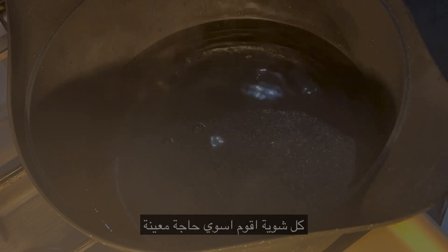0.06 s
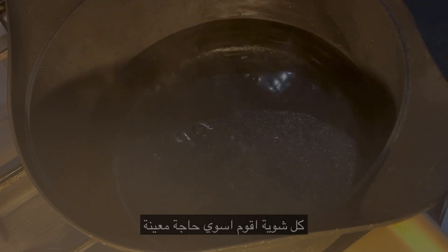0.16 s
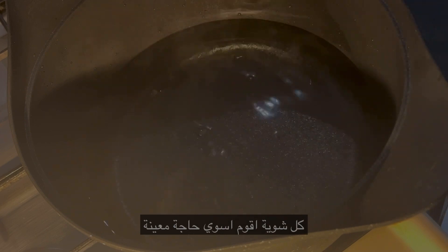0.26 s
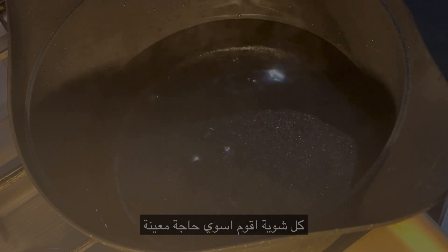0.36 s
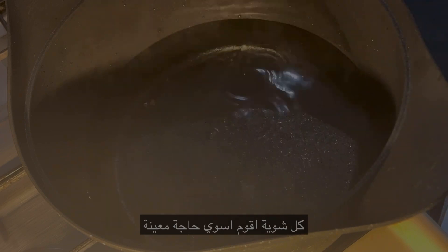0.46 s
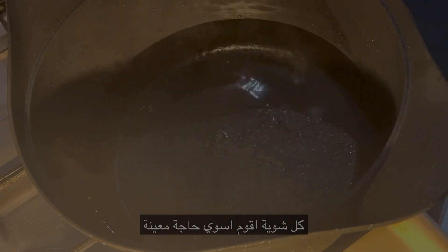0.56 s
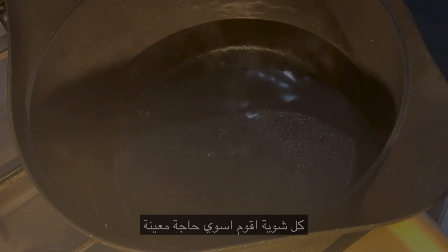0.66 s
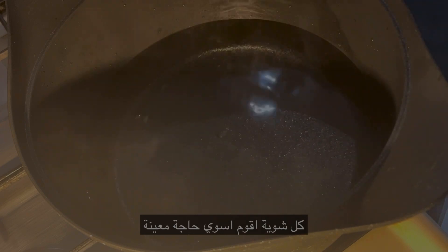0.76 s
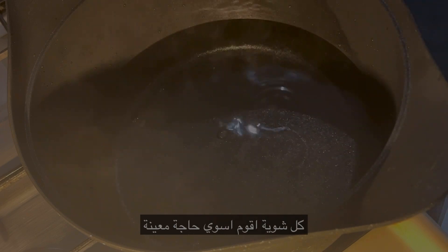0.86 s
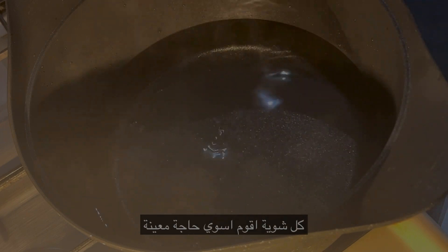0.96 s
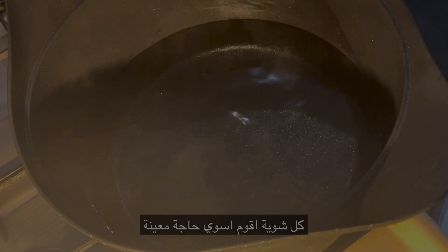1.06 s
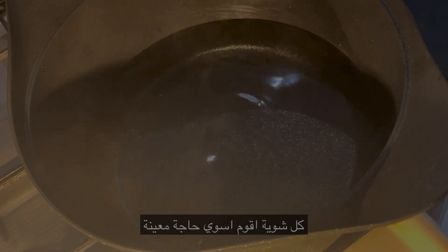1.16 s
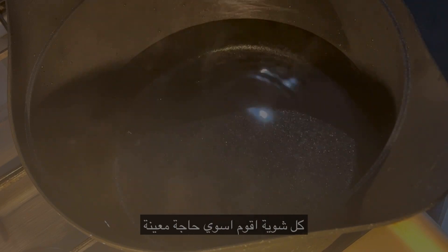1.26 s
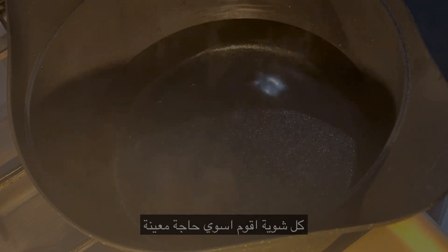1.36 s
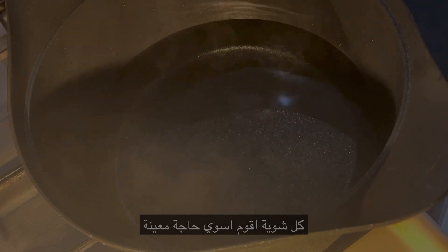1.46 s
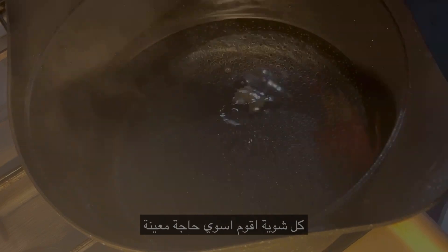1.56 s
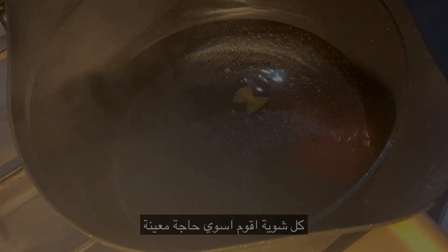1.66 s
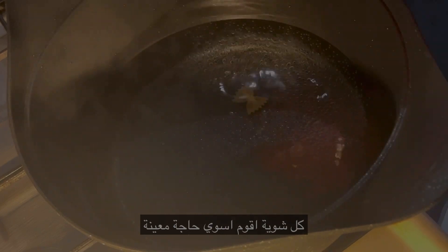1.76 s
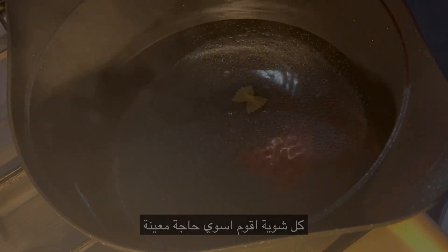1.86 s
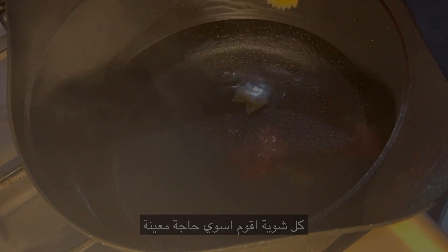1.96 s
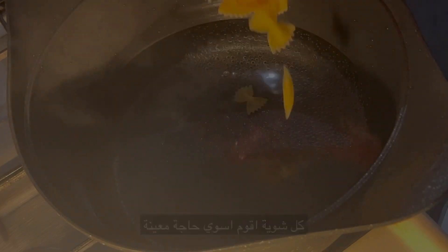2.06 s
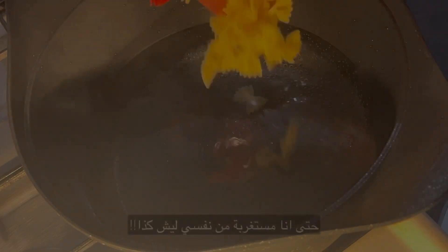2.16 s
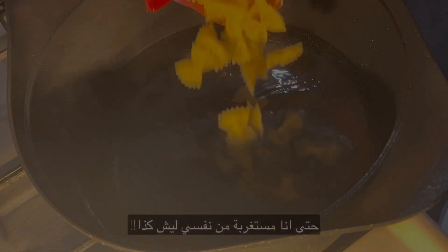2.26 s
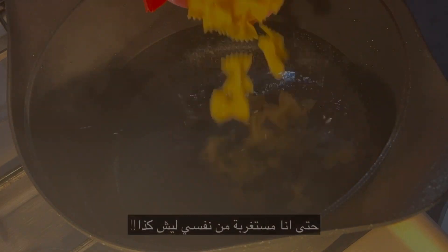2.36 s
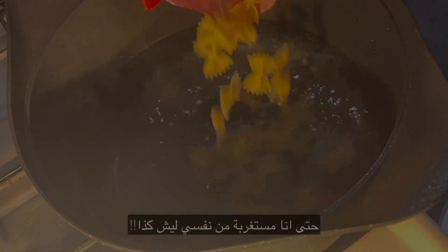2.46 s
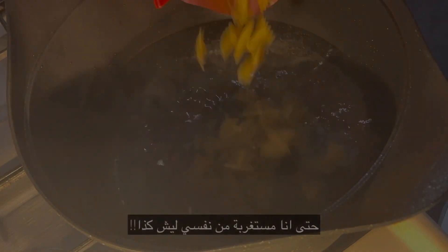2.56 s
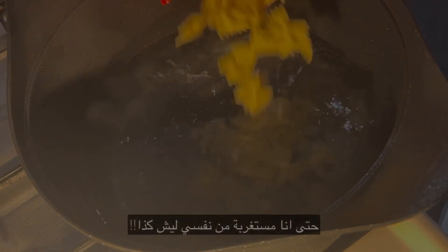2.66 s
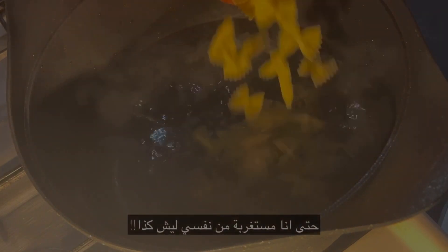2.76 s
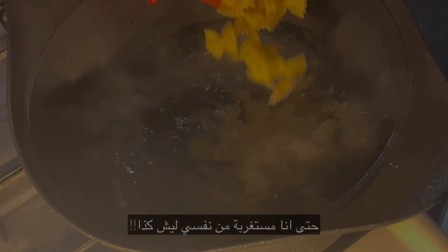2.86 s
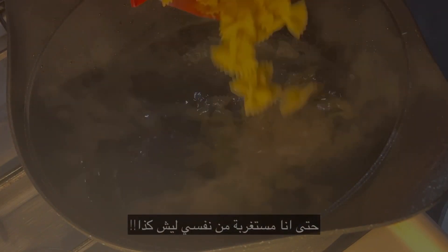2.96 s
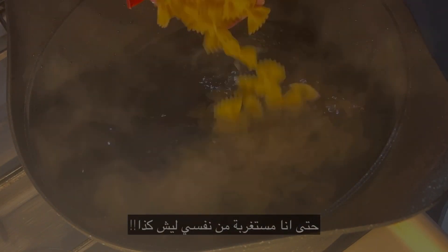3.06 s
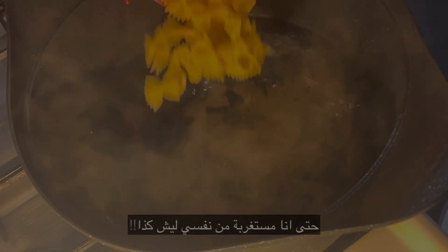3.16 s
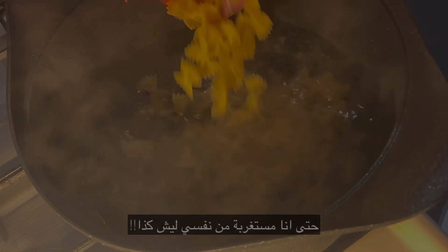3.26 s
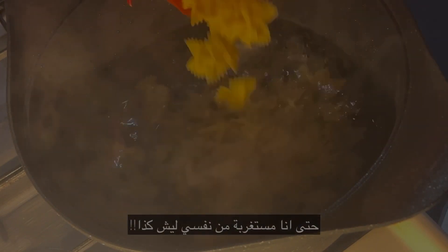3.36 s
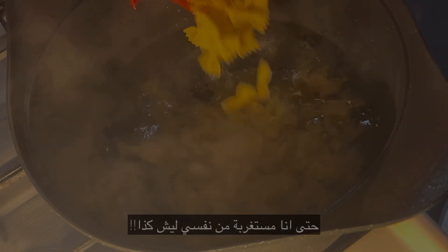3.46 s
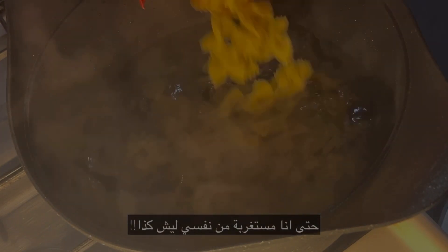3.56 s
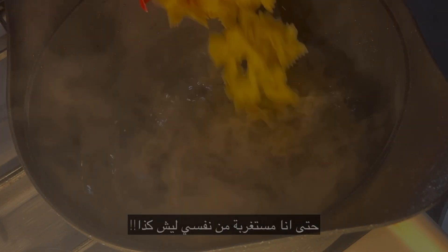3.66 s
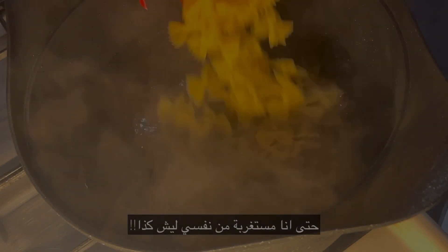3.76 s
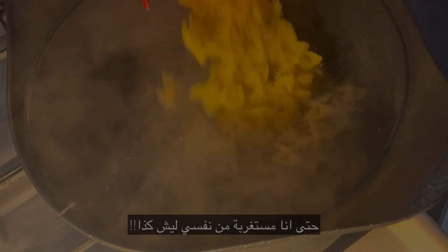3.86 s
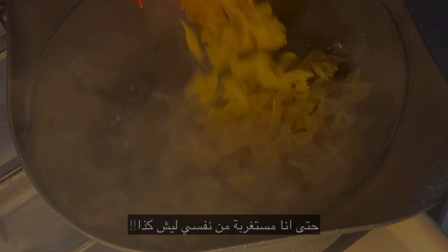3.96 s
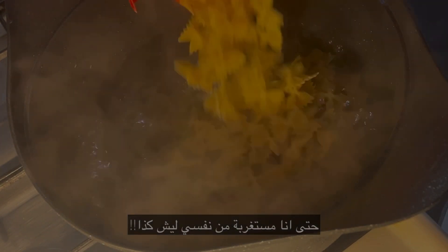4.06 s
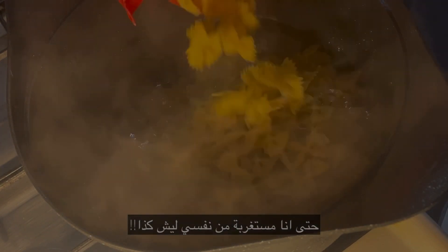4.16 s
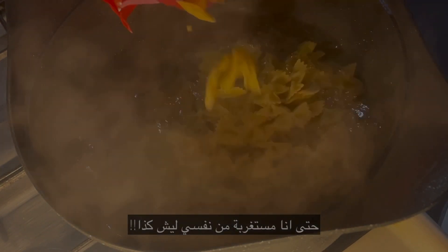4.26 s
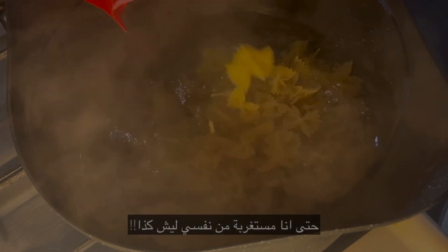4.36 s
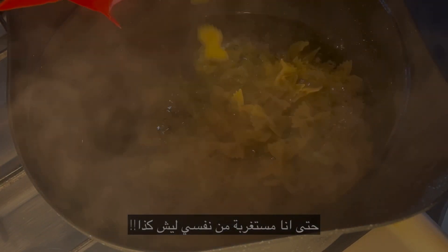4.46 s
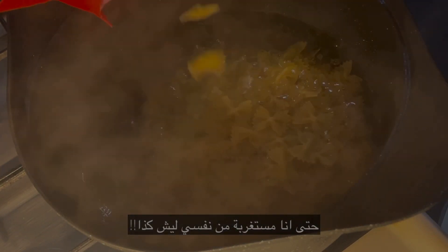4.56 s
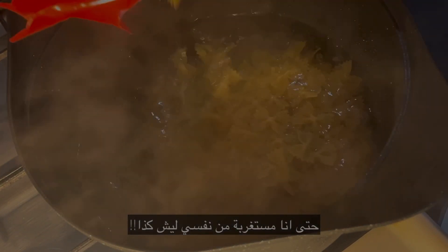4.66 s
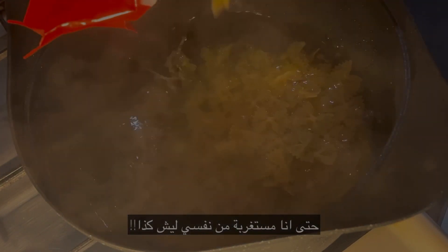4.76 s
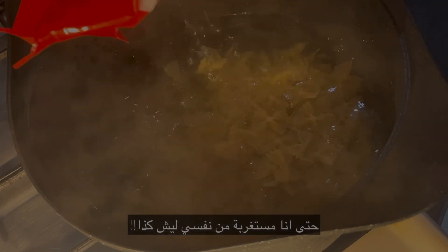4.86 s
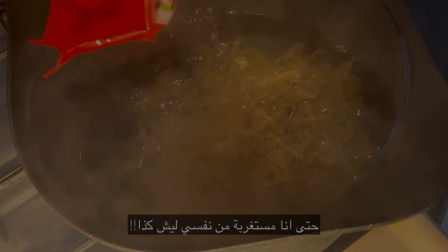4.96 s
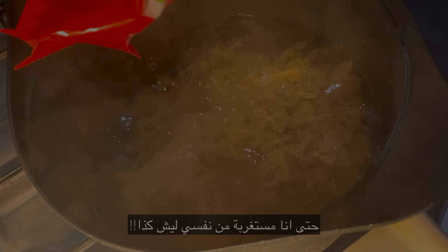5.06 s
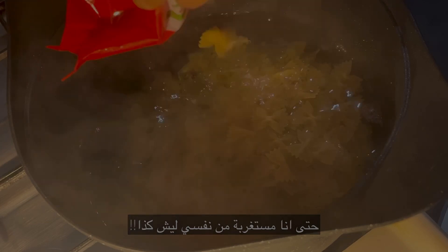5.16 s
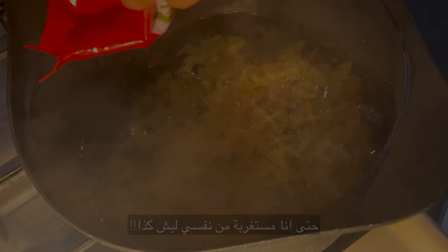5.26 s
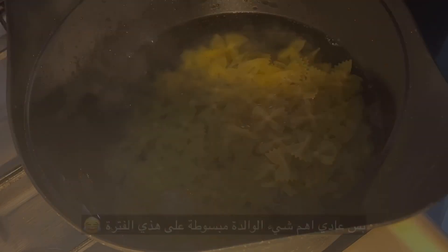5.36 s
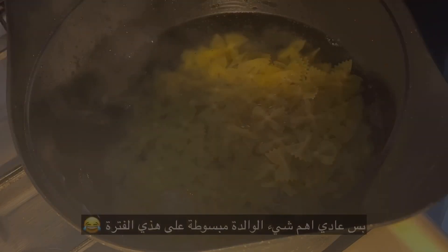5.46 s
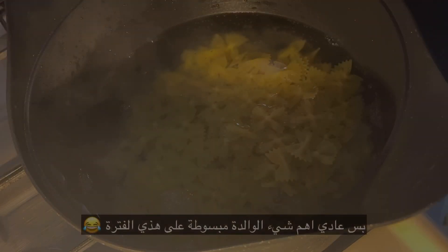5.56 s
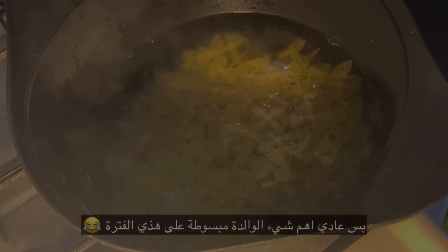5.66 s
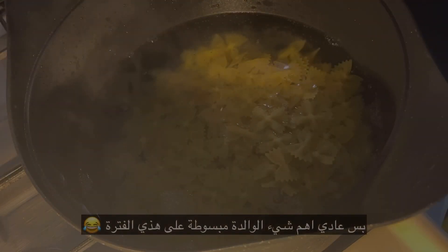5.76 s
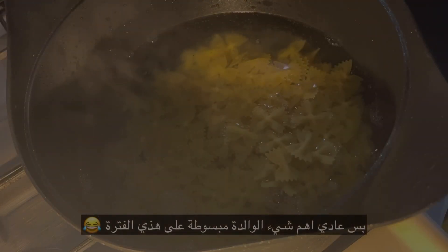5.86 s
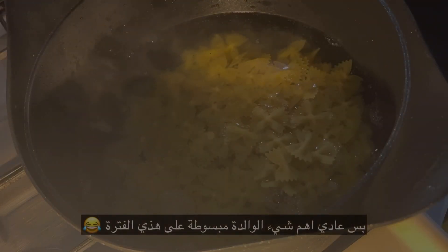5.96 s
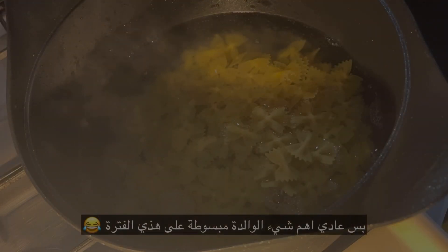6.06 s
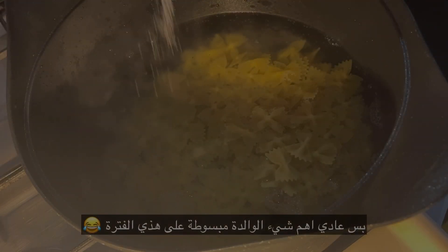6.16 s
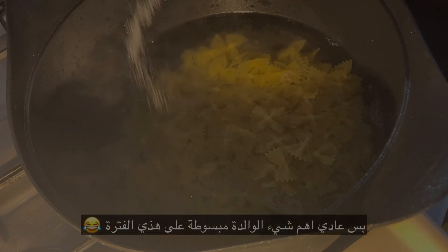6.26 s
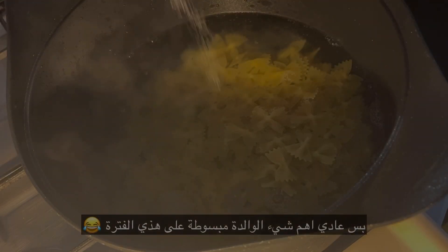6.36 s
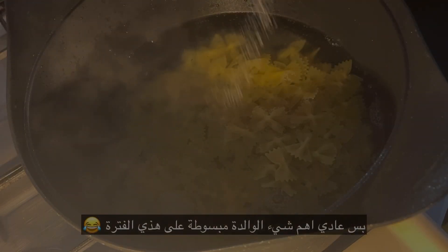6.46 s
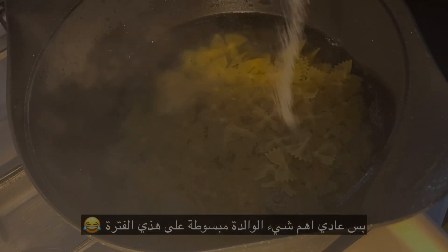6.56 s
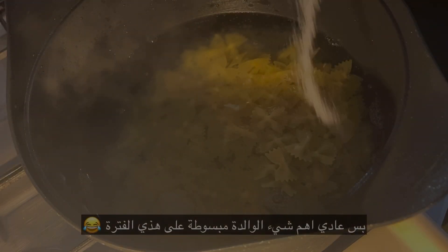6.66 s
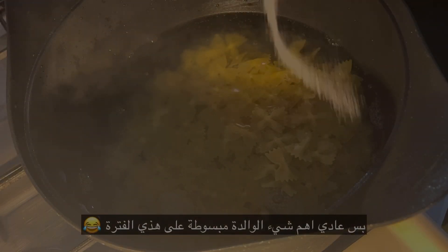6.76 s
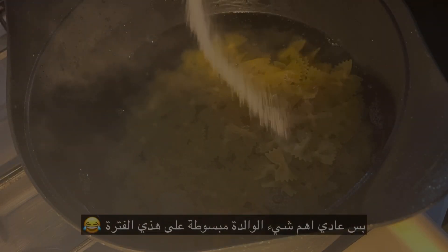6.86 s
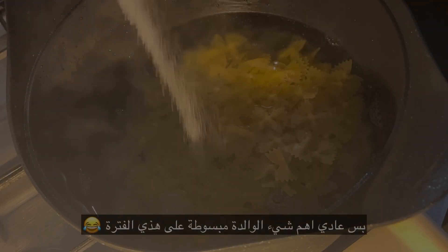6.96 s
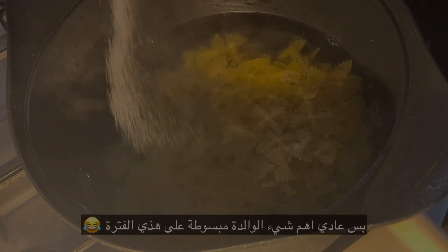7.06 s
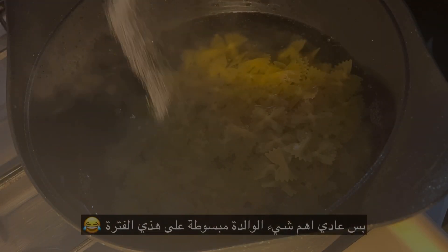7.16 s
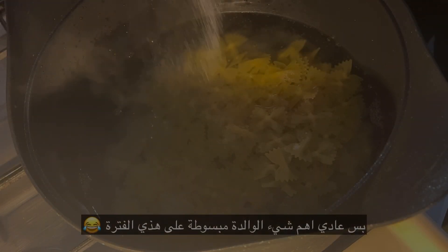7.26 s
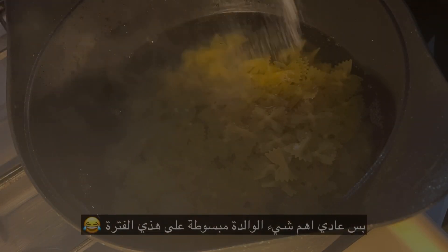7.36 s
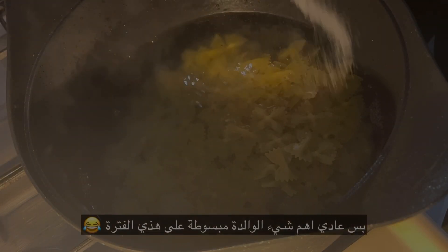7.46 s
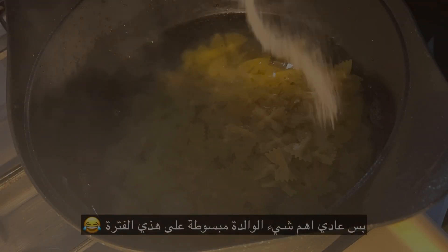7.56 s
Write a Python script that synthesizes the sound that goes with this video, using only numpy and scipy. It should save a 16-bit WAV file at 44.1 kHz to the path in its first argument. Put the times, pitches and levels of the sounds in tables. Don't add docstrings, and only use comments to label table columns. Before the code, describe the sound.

Low extractor hum, a heavy pot landing with a gritty scrape, a growing clattering rush of dry pasta into water, then soft stirring swishes.

```python
import sys
import numpy as np
from scipy import signal
from scipy.fft import rfft, irfft, next_fast_len
from scipy.io import wavfile
from scipy.ndimage import uniform_filter1d, minimum_filter1d, map_coordinates

SR = 44100
rng = np.random.default_rng(int(sys.argv[2]) if len(sys.argv) > 2 else 0)


def level_to_linear(level):
    exponent = np.asarray(level, float) / 20
    return 10 ** exponent


def unload_wav(signal):
    wavfile.write(
        sys.argv[1],
        SR,
        np.round(np.clip(np.atleast_2d(signal).T, -1, 1) * 32767).astype(np.int16),
    )


N = 336218

# start_s, hum_db, hum_drift_db_per_s, double_hum_db, steam_db
VIEWS = [
    (0, -48, -13, -41.5, -78),
    (.9, -50, 7, -45.5, -88),
    (1.58, -53, 1, -45.5, -98),
    (5.33, -40.5, -2.5, -48, -73.5),
]
# weakest_s, period_s
BEATS = [(.2, 0.3), (1.2, 0.41), (3.2, 1.88), (6.2, 2.9)]
# middle_s, half_width_s
CHANGES = [
    (1.566, 0.0086),
    (5.329, 0.024466),
]
# pitch_hz, level_db
RUMBLE = [(25, -35), (45, -7.5), (90, 1.5), (180, -3.5), (300, -10.5), (500, -19), (900, -22), (1700, -31),
          (2600, -31), (5000, -38.5), (9000, -84)]
# pitch_hz, level_db
HISS = [(1500, -12), (3000, -9.5), (5000, -3), (9000, -3.5), (13000, -3.5), (16000, -7)]
# (over 20 dB; if fall_s is negative, the
SWISHES = [
    (.55, -69, 0.34, -1),
    (5.92, -59, 0.21, 0.42),
    (6.144, -62, 0.087, 0.21),
    (6.54, -67.5, 0.29, -0.1),
    (6.88, -67, 0.12, 0.16),
]
# start_s, level_db, fade_60db_s
FAR_KNOCK = (.108, -43, 0.76)
# time_s, level_db
DRAG = [
    (.906, -60),
    (.98, -48.5),
    (1.068, -38.5),
    (1.254, -35),
    (1.272, -25),
    (1.33, -30.5),
    (1.52, -45.5),
    (1.58, -45.5),
]
# start_s, level_db, pitch_hz, rise_s,
# fade_60db_s
THUDS = [(0.899, -40, 119, 0.008, 0.5), (.975, -26, 119.5, 0.022, 0.34), (1.056, -17.5, 70.5, 0.016, 0.25),
         (1.096, -20, 65.3, 0.0085, 0.33), (1.101, -21.5, 123, 0.0045, 0.12),
         (1.195, -23.5, 118, 0.0038, 0.25), (1.225, -13.5, 64, .01, 0.16), (1.286, 1, 66.87, 0.018, 0.13),
         (1.272, -4, 122, 0.0065, 0.21), (1.336, -8, 127.7, 0.0064, 0.28),
         (1.374, -14.5, 135.7, .012, 0.44), (1.435, -19, 133, 0.012, 0.18),
         (1.47, -17.5, 70, 0.0069, 0.073), (1.525, -18, 121, 0.009, 0.091), (1.099, -36, 386, .01, 0.44),
         (1.195, -34, 384, .005, 0.43), (1.273, -26.5, 392, 0.0071, 0.32)]
# start_s, level_db, fade_60db_s
SKIDS = [
    (.908, -43, 0.45),
    (1.073, -41, 0.2766),
    (1.27, -34, 0.56),
    (1.437, -45.5, 0.74),
    (1.462, -46, 0.61),
]
# pitch_hz, level_db
GRIT = [(1500, 10), (2500, 10), (5000, 7.5), (8000, 1), (12000, -8), (16000, -22.5)]
# start_s, level_db, pitch_hz, fade_60db_s, room_db
KNOCKS = [
    (0.907, -38, 810, 0.082, -25),
    (0.985, -33, 750, 0.0506, -9),
    (1.053, -34, 223, 0.063, -5),
    (1.094, -26, 203, 0.066, -3.5),
    (1.193, -23.5, 234, 0.067, -3),
    (1.272, -11.5, 209, 0.11, -6.5),
    (1.438, -46, 193, 0.053, -17),
    (2.446, -16.5, 260, 0.028, -15),
    (2.917, -25.5, 488, 0.053, 3),
    (5.022, -30, 293, 0.049, -34),
]
# start_s, level_db, pitch_hz, ring_db, ring_hz
GRATE = [(0.9078, -26.5, 4400, -2, 830), (0.96, -23.5, 2800, -17, 1620), (1.1927, -43, 2000, 11.5, 640),
         (1.2695, -33, 2300, -16, 740), (1.4376, -27.5, 2400, -6, 1100), (1.4, -24, 4500, -4, 580),
         (2.9, -20.5, 2300, -2.5, 1200), (2.8, -19.5, 4500, 4, 1600), (3.4, -17.5, 5100, -3.5, 1750),
         (4.3, -16, 2900, -19, 2300), (2.3023, -22.5, 3600, -2, 1700), (2.483, -24.5, 3552, 6, 1140),
         (4.464, -22, 3900, 1.5, 1060), (5.093, -37.5, 4200, 6.5, 890), (5.0145, -41, 12000, 9.5, 1140)]
# time_s, level_db
FLOW = [(1.58, -61.5), (1.754, -48), (1.87, -47), (1.974, -43.5), (2.4, -42), (2.62, -38), (2.846, -34),
        (2.9, -40.5), (3.13, -41), (3.356, -32), (3.412, -36), (3.794, -26), (4.332, -35), (4.41, -45.5),
        (4.606, -50.5), (4.876, -59), (5.19, -61.5), (5.32, -50)]
# middle_s, level_db (over the flow)
HANDFULS = [
    (2.445, 10),
    (2.514, 4),
    (2.926, 9.5),
    (3.24, 0.5),
    (4.432, 7),
    (2.78, 3),
    (3.29, -2),
]
# level_db (at reference flow), growth_db_per_db, filling_db_per_s
LAYERS = [
    (-39, 0.96, -4),
    (-32.5, 0.9, 0.3),
    (-29.5, 1.03, 1.2),
    (-31.5, 1, 1.4),
]
# pitch_hz, width_hz, level_db
POT_AIR = [(960, 297, 11.5), (1920, 390, 12), (1350, 320, -17)]
# pitch_hz, width_hz, level_db
PASTA = [(2770, 1280, -0.5), (4000, 330, 4.5), (4860, 1270, -1.5)]
# pitch_hz, level_db
BAG = [(3000, -14), (5500, -2.5), (8000, -1), (11000, -4), (13000, -1), (16000, -7.5)]
# start_s, level_db, pitch_hz, plop_db, plop_hz
FIRST = [(1.6312, -38, 3290, 3, 1020), (1.652, -41, 5080, 7.5, 1200), (1.6755, -34.5, 1900, 7, 880),
         (1.6847, -22, 3760, -3.5, 1900), (1.7272, -26.5, 2930, -15, 1100), (1.781, -30.5, 3040, 9.5, 960),
         (1.814, -27, 7900, -1, 1350), (1.8407, -23, 3310, -4, 1220), (1.9798, -11, 3080, -5.5, 1380),
         (2.0243, -24.5, 3380, 2, 1150), (2.0629, -11, 3490, -5.5, 1530), (2.1015, -13.5, 6697, -16, 1770),
         (2.181, -21, 3540, -19, 963.4), (2.215, -15.5, 3150, -19, 1620), (2.2558, -22, 8300, -26, 1208),
         (2.2975, -18, 7400, -7.5, 1840), (2.337, -14, 4450, -8.5, 1120), (2.3741, -6.5, 8400, -14.5, 1900),
         (2.425, -11.5, 4870, -24, 880), (2.444, -20.5, 3300, -16, 1570), (2.488, -28, 3520, 0, 1150),
         (2.523, -13, 8750, -10, 1270), (2.545, -30, 3710, 13, 1104), (2.5653, -20.5, 4220, 1, 660)]
# start_s, level_db, pitch_hz
STREAM = [(2.61, -33, 4030), (2.6424, -31, 4640), (2.6718, -20, 4820), (2.6903, -13, 3320),
          (2.7102, -10.5, 3450), (2.7307, -10, 2840), (2.7596, -14, 8900), (2.7596, -17, 3200),
          (2.8265, -10.5, 3460), (2.9183, -16, 3540), (2.9314, -12.5, 3300), (3.0001, -15, 3489),
          (3.0144, -15.5, 3680), (3.0554, -21.5, 3650), (3.0834, -18, 4376), (3.0924, -20, 4027),
          (3.1023, -14.5, 3940), (3.1424, -26, 4790), (3.1944, -21, 4750), (3.2161, -12, 3320),
          (3.2345, -18, 3270), (3.2464, -16.5, 5290), (3.2725, -12, 4090), (3.2854, -15, 3930),
          (3.3214, -10.5, 4970), (3.3453, -9.5, 7450), (3.3682, -24, 3700), (3.3907, -13, 3600),
          (3.457, -12, 2880), (3.5314, -25, 4130), (3.5389, -11, 8040), (3.5484, -7, 3740),
          (3.6614, -11, 3900), (3.677, -8, 4300), (3.6964, -19, 3720), (3.7804, -8, 2950),
          (3.8516, -1, 7720), (3.936, -5.5, 3980), (4.0574, -12, 4960), (4.0632, 7, 12000),
          (4.1874, -15, 4030), (4.2373, -41, 3540), (4.2587, -15, 8200), (4.3074, -22, 8100),
          (4.3244, -11, 7070), (4.3504, -32, 4870), (4.4119, -16, 8200)]
# start_s, level_db, pitch_hz
PLOPS = [(2.61, -28, 1040), (2.637, -23, 1900), (2.671, -15.5, 1960), (2.691, -19, 1900), (2.71, -20, 1830),
         (2.77, -17, 1320), (2.829, -19, 1820), (2.905, -31, 1420), (2.92, -19, 1777), (2.93, -19.5, 920),
         (2.957, -24, 1060), (3.0, -20, 1749), (3.015, -20.5, 1803), (3.089, -20, 1870),
         (3.102, -18.5, 1930), (3.216, -32, 1080), (3.235, -16, 960), (3.245, -15, 1770), (3.27, -23, 1010),
         (3.326, -15, 1940), (3.373, -16, 803.9), (3.424, -15, 940), (3.449, -14.5, 2000),
         (3.52, -32, 1320), (3.539, -17, 1930), (3.586, -16, 1780), (3.633, -17, 1010), (3.663, -23, 1900),
         (3.68, -15, 1950), (3.697, -8.5, 1890), (3.711, -15, 1740), (3.779, -10, 1640), (3.853, -18, 930),
         (3.892, -13.5, 1700), (4.035, -14.5, 1790), (4.058, -10.5, 1900), (4.163, -12, 1880),
         (4.227, -30, 1000), (4.351, -27, 1080), (4.378, -35, 1070)]
# start_s, level_db, pitch_hz, plop_db, plop_hz
LAST = [(4.4385, -14.5, 8400, -15, 1338), (4.503, -21.5, 3486, -12, 1110), (4.5192, -17, 11800, -10, 1446),
        (4.556, -15, 11750, -17, 1120), (4.598, -19, 8160, -20, 1860), (4.602, -18.5, 8500, -9, 1700),
        (4.6283, -17.5, 3910, -23, 1640), (4.6315, -15.5, 12700, -9.5, 1550),
        (4.6432, -18, 7600, -32, 1430), (4.653, -18, 13500, -12, 1180), (4.6605, -26, 3860, -13, 1200),
        (4.676, -25, 3940, -3, 970), (4.753, -18, 12800, -35, 1560), (4.7551, -22, 4130, -7, 960),
        (4.8214, -22.5, 5040, -30, 1010), (4.8334, -17, 12200, -1, 1410), (4.887, -39, 3890, 10.5, 1510),
        (5.104, -42.5, 3540, 15, 1510), (5.121, -31, 4270, 6, 1400), (5.1427, -34, 3200, -2, 820),
        (5.2058, -30, 4630, 7, 1320), (5.216, -22.5, 7300, -1, 1900), (5.2549, -11.5, 12200, -22, 1350),
        (5.2546, -20, 4660, -31, 1290), (5.2768, -29.5, 3170, 2, 900), (5.282, -32, 2700, 11.5, 1400),
        (5.305, -30, 3990, 6, 1020)]
# start_s, level_db, pitch_hz, plop_db, plop_hz
STIRS = [
    (5.6136, -36, 12400, -13, 1500),
    (6.5752, -36.5, 12200, -24, 1490),
    (6.882, -40, 9050, -24.5, 1500),
    (6.9491, -34, 12500, -27, 1500),
]
# pitch_hz, fade_60db_s
KITCHEN = [(200, 0.54), (1500, 0.25), (6000, 0.21), (15000, 0.11)]
# pitch_hz, level_db
APART = [(130, -40), (280, -10.5), (700, -9), (1400, -14), (3000, -10), (8000, -8)]
# pitch_hz, lead_radians
LEAD = [(130, -.05), (430, -.55), (1810, .1), (2450, 2.0), (2700, 2.4), (3000, 1.7), (3700, .9),
        (5000, 1.4), (5950, 3.14), (17000, 19.25)]
# pitch_hz, level_db
TILT = [(200, 0), (380, -.6), (700, -1.7), (1290, -.5), (2380, 0)]
# pitch_hz, share
WEAK = [(4900, 0), (5500, .27), (10000, .42), (14000, .4), (15200, .47)]
# low_hz, high_hz, threshold
FRAYED = [(2620, 2780, -1.1), (5500, 5750, -.3), (6250, 6500, -.9)]


def unit(x):
    return x / np.sqrt(np.mean(x ** 2) + 1e-20)


def along(points, hz):
    f, v = np.transpose(points)
    return np.interp(np.log(hz + 1), np.log(f + 1), v)


def curves(rows, outside=-150):
    s, *columns = np.transpose(rows)
    t = np.arange(N) / SR
    return [np.interp(t, s, column, outside, outside) for column in columns]


def per_view(rows):
    starts = [view[0] for view in VIEWS[1:]]
    return np.array(rows)[np.searchsorted(starts, np.arange(N) / SR)].T


def decays(rows):
    t = np.arange(N) / SR
    return sum((t >= s) * level_to_linear(db - 60 * np.clip(t - s, 0, 2) / t60) for s, db, t60 in rows)


def wobble(rate):
    knots = rng.standard_normal(int(N * rate / SR) + 4)
    return map_coordinates(knots, [np.arange(N) * rate / SR])


def sine(hz):
    return np.sqrt(2) * np.sin(2 * np.pi * np.cumsum(hz) / SR)


def filtered(x, response):
    size = next_fast_len(N + 8192)
    return irfft(rfft(x, size) * response(np.fft.rfftfreq(size, 1 / SR)), size)[..., :N]


def modes(table):
    def response(f):
        total = 0
        for k, (centre, width, db) in enumerate(table):
            loss = 1j * f * width
            total = total + (-1) ** k * level_to_linear(db) * loss / (centre * centre - f * f + loss)
        return total
    return response


def colour(spectrum):
    return lambda f: level_to_linear(along([(0.97, -120)] + list(spectrum), f)) * (f < spectrum[-1][0])


def rattle(response, per_s, spread_db, life, share):
    hits = rng.random((2, N))
    sizes = (hits[0] < per_s / SR) * level_to_linear(-spread_db * np.log(hits[1] + 1 / 40))
    burst = signal.lfilter([1], [1, -np.exp(-1 / (life * SR))], sizes)
    share = np.clip(share, 0, 1)
    mix = np.sqrt(share) * unit(burst) + np.sqrt(1 - share)
    return unit(filtered(mix * rng.standard_normal(N), response))


def tail(size):
    hz, t, z = signal.stft(rng.standard_normal(size), SR, nperseg=256)
    fade = level_to_linear(-60 * t / along(KITCHEN, hz)[:, None])
    echo = signal.istft(z * fade, SR, nperseg=256)[1]
    return echo / np.linalg.norm(echo)


def flow():
    t = np.arange(N) / SR
    handfuls = sum(db * np.exp(-((t - s) / 0.013) ** 2) for s, db in HANDFULS)
    return curves(FLOW)[0] + 30 + handfuls


def extractor():
    t = np.arange(N) / SR
    start, low_db, drift, double_db, _ = per_view(VIEWS)
    weakest, period = per_view(BEATS)
    weaker = 0.65
    beat = abs(1 - weaker * np.exp(2j * np.pi * (t - weakest) / period)) / (1 + weaker)
    mains = level_to_linear(low_db + drift * (t - start) + 1.2 * wobble(12)) * sine(59.5 + 1.5 * wobble(25))
    double = sine(119 + 2.5 * wobble(25))
    triple = level_to_linear(-62.5 + 5.4 * wobble(5)) * sine(179 + 2 * wobble(25))
    return mains + beat * level_to_linear(double_db + 0.22 * wobble(5.3)) * double + triple


def flame():
    t = np.arange(N) / SR
    rumble_db = -48.5 + 0.36 * np.clip(flow() + 20, 0, None)
    rumble = unit(filtered(rng.standard_normal(N), colour(RUMBLE)))
    whistle = modes([(1240, 260, 0)])
    jets = unit(filtered(rng.standard_normal(N), lambda f: whistle(f) ** 2))
    strokes = [db - 20 * np.maximum((s - t) / rise, (t - s) / fall) ** 2 for s, db, rise, fall in SWISHES]
    air_db = np.maximum(np.max(strokes, axis=0), per_view(VIEWS)[4])
    air = rattle(colour(HISS), 300, spread_db=-3, life=0.0041, share=0.13)
    return level_to_linear(rumble_db + wobble(12)) * rumble + level_to_linear(-60) * jets + level_to_linear(air_db + 8.0) * air


def far_knock():
    echo = filtered(rng.standard_normal(N), modes([(564.8, 570, 2.0), (1020, 340, 6.5), (1900, 1500, -1.5)]))
    dull = filtered(echo, lambda f: 1 / (1 + (f / 3500) ** 2))
    return decays([FAR_KNOCK]) * unit(dull)


def set_down():
    knock_db, = curves(DRAG)
    clatter_db = np.where(knock_db > -99, -44 + 0.72 * (knock_db + 37), -150)
    shudder, t = np.zeros(N), np.arange(SR // 2) / SR
    press_s = 1.418
    for s, db, hz, rise, t60 in THUDS:
        free = np.clip((press_s - s - t) / .008, .05, 1) if s < press_s else 1
        swell = level_to_linear(db - 60 * t / t60) * (1 - np.exp(-t / rise))
        shudder[round(s * SR):][:len(t)] += free * swell * np.sin(2 * np.pi * hz * t)
    knock_body = modes([(220, 70, -2.5), (386, 92, -3), (630, 256, -12)])
    knock = rattle(knock_body, 89, spread_db=-15.5, life=0.012, share=0.24)
    clatter_body = modes([(840, 450, 0), (1720, 1100, 0)])
    clatter = rattle(clatter_body, 270, spread_db=6, life=0.0023, share=0.3)
    grit = rattle(colour(GRIT), 180, spread_db=5, life=0.000973, share=0.068)
    before_change = np.arange(N) < CHANGES[0][0] * SR
    skids = before_change * (shudder + decays(SKIDS) * grit)
    return skids + level_to_linear(knock_db) * knock + level_to_linear(clatter_db) * clatter


def knocks():
    out, t = np.zeros(N + SR), np.arange(4096) / SR
    for s, db, hz, t60, room_db in KNOCKS:
        ring = np.sin(2 * np.pi * hz * t) * level_to_linear(-60 * t / t60)
        noise = signal.lfilter([.12], [1, -1.4, .5], rng.standard_normal(len(t)))
        crack = noise * level_to_linear(-60 * t / 0.033)
        blow = level_to_linear(db) * (ring + 0.61 * crack)
        wet = level_to_linear(room_db + 6.0) * signal.fftconvolve(level_to_linear(db) * crack, tail(size=SR // 2))
        out[round(s * SR):][:len(t)] += blow
        out[round(s * SR):][:len(wet)] += wet
    return out[:N]


def pour():
    filling = np.clip(np.arange(N) / SR - 3.5, None, .7)
    levels = []
    for db, grows, fill in LAYERS:
        silence = 99 * (flow() < -99)
        levels.append(db + grows * flow() - silence + fill * filling + 2.26 * wobble(28))
    splash_db, pot_db, rattle_db, bag_db = levels
    sparse = np.clip((-22 - rattle_db) / 14, .4, 1)
    water = modes([(223, 125, 0), (538, 304, 0.017)])
    splash = rattle(water, 63, spread_db=-3.0, life=0.0045, share=0.11)
    pot = rattle(modes(POT_AIR), 250, spread_db=4.0, life=0.0017, share=0.39 * sparse)
    pieces = rattle(modes(PASTA), 300, spread_db=3, life=.0016, share=.5 * sparse)
    bag = rattle(colour(BAG), 300, spread_db=3.5, life=.001, share=.5 * sparse)
    wet = level_to_linear(splash_db) * splash + level_to_linear(pot_db) * pot
    return wet + level_to_linear(rattle_db + 2.5) * pieces + level_to_linear(bag_db + 3.0) * bag


def plop(hz, t):
    f = np.fft.rfftfreq(len(t), 1 / SR)
    noise = rng.standard_normal(len(t)) * level_to_linear(-60 * t / 0.022)
    slap = irfft(rfft(noise) * modes([(hz, .5 * hz, 0)])(f))
    bubble = np.sin(2 * np.pi * hz * t * (1 + 8 * t)) * level_to_linear(-60 * t / 0.024)
    return 0.79 * slap / abs(slap).max() + 0.5 * bubble


def ticks():
    out, t = np.zeros(N + SR), np.arange(2048) / SR
    f = np.fft.rfftfreq(len(t), 1 / SR)
    stream = []
    for s, db, hz in STREAM:
        plop_hz = rng.choice((1075, 1880))
        stream.append((s, min(db - 2.0, -7), hz, -14, plop_hz))
    for s, db, hz, plop_db, plop_hz in FIRST + stream + LAST + STIRS + GRATE:
        t60 = 0.010 * (4000 / hz) ** .5
        edge = rng.standard_normal(len(t)) * level_to_linear(-60 * t / t60)
        edge[0] = 5
        body = modes([(hz, .22 * hz, 0), (1.55 * hz, .5 * hz, -3), (12000, 9000, -10), (.6 * hz, .3 * hz, -8)])
        snap = irfft(rfft(edge) * body(f))
        ring = .45 * np.sin(2 * np.pi * hz * t) * level_to_linear(-60 * t / (2.2 * t60))
        tick = 0.94 * snap / abs(snap).max() + ring + level_to_linear(plop_db) * plop(plop_hz, t)
        out[round(s * SR):][:len(t)] += level_to_linear(db) * tick
    for s, db, hz in PLOPS:
        out[round(s * SR):][:len(t)] += level_to_linear(db - 2.5) * plop(hz, t)
    return out[:N]


def chinks():
    draw = rng.random((int(N / SR * 500), 3))
    k = np.arange(512)
    start = (draw[:, 0] * (N - 512)).astype(int)
    spread = 0.59
    hz = np.clip(2300 * np.exp(spread * 3.35 * (draw[:, 1:2] - .5)), 500, 9000)
    size = level_to_linear(-38 + flow()[start] - 5.89 * np.log(draw[:, 2] + 0.016))[:, None]
    turns = hz * k / SR
    rings = size * np.sin(2 * np.pi * turns) * np.exp(-3 * turns / 18.6)
    return np.bincount((start[:, None] + k).ravel(), rings.ravel(), N)


def scene():
    near = pour() + ticks() + chinks()
    shared = near + knocks() + far_knock() + set_down() + extractor() + flame()
    shared = shared + level_to_linear(-11.0) * signal.fftconvolve(near, tail(size=SR // 2))[:N]
    z = signal.stft(filtered(shared, lambda f: level_to_linear(along(APART, f) + 1.5)), nperseg=128)[2]
    scattered = z * np.exp(2j * np.pi * rng.random(z.shape))
    other = signal.istft(scattered, nperseg=128)[1][:N]
    return np.array([shared + other, shared - other])


def steady(x, jump_db):
    power = np.pad(np.diff(x) ** 2, (0, -(N - 1) % 1024))
    parts = power.reshape(-1, 8, 128).mean(axis=2)
    calm = parts < level_to_linear(2 * jump_db) * np.median(parts, axis=1, keepdims=True)
    calm = np.repeat(calm.ravel(), 128)[:N] * 1.
    return uniform_filter1d(minimum_filter1d(calm, size=400), size=100)


def roll_off(x):
    return signal.sosfilt(signal.butter(12, 17010, fs=SR, output="sos"), x)


def record(dry):
    t = np.arange(N) / SR
    for s, half in CHANGES:
        dry = dry * np.clip(abs(t - s) / half, .1, 1)
    dry = signal.sosfilt(signal.butter(4, 46, "high", fs=SR, output="sos"), dry)

    def ports(f):
        balance = np.log(level_to_linear(along(TILT, f)))
        lead = np.interp(f, *np.transpose(LEAD))
        return np.array([[1], [-1]]) * (balance + 1j * lead) / 2

    def weak(f):
        angle = ports(f)[0].imag
        strength = abs(np.array([np.cos(angle), np.sin(angle)]))
        return strength < along(WEAK, f) * [[1], [1.25]]

    left, right = filtered(dry, lambda f: np.exp(ports(f)) * (f < 15900))
    pair = np.array([left + right, left - right]) / 2
    calm = steady(left, jump_db=7.2)
    pair = pair - calm * filtered(pair, weak)
    thin = wobble(30) < -.1 + 1.5 * (t < CHANGES[0][0])
    thin = uniform_filter1d(thin * 1., size=600)
    pair[0] -= calm * thin * filtered(pair[0], lambda f: f > 14000)
    for low, high, often in FRAYED:
        gone = uniform_filter1d((wobble(25) < often) * 1., size=300)
        pair[0] -= calm * gone * filtered(pair[0], lambda f: (f > low) & (f < high))
    mix = np.array([pair[0] + pair[1], pair[0] - pair[1]])
    return roll_off(mix)


dry = scene()
out = record(dry)
unload_wav(out)
```